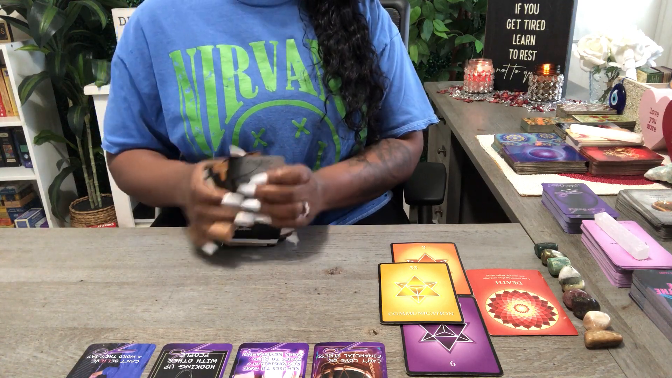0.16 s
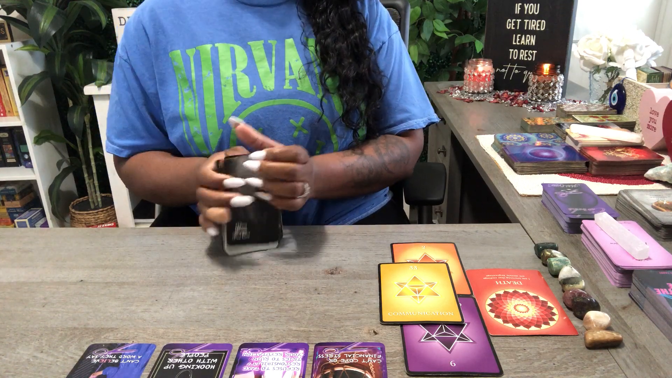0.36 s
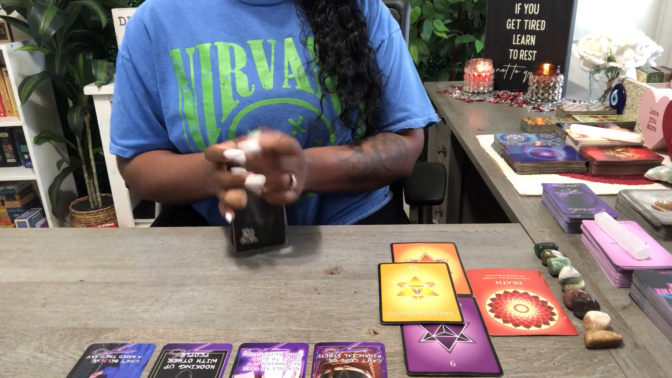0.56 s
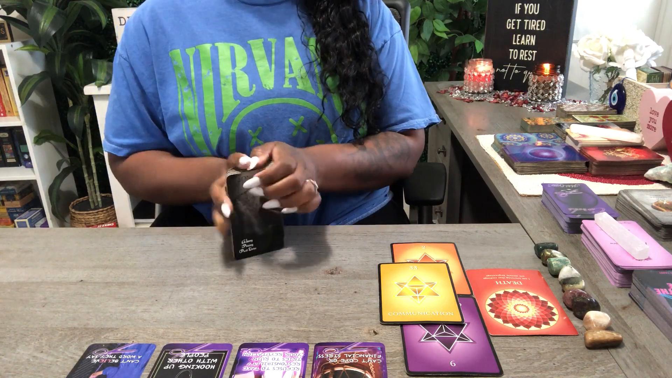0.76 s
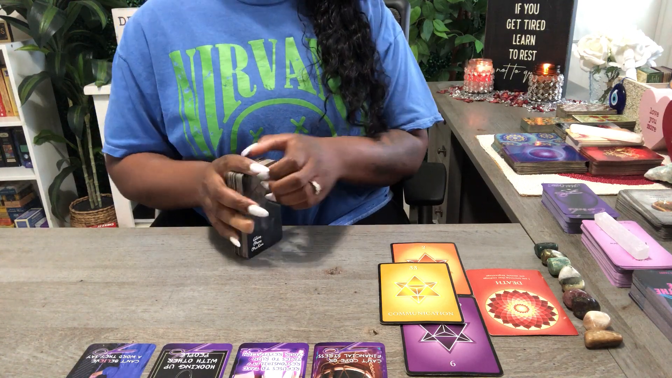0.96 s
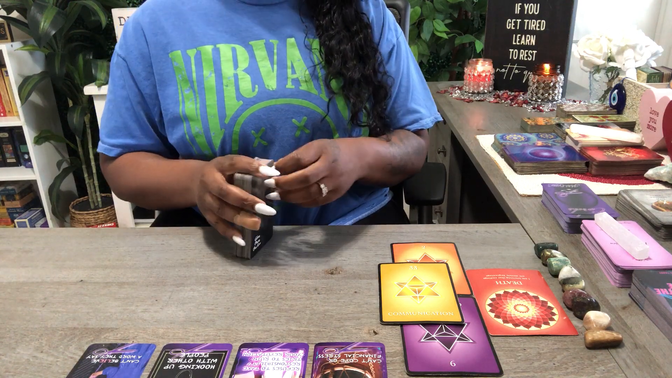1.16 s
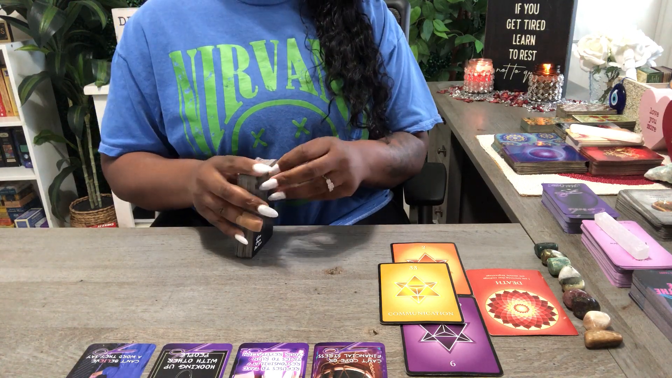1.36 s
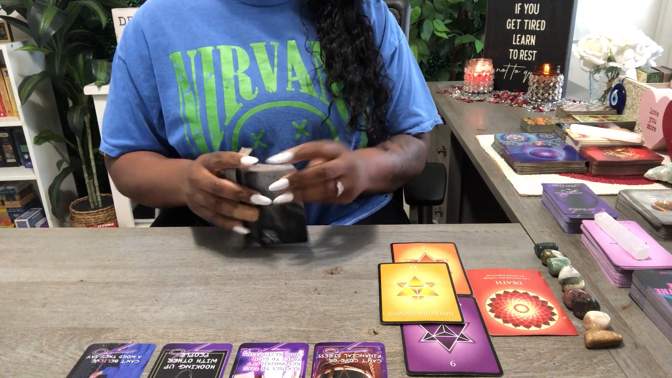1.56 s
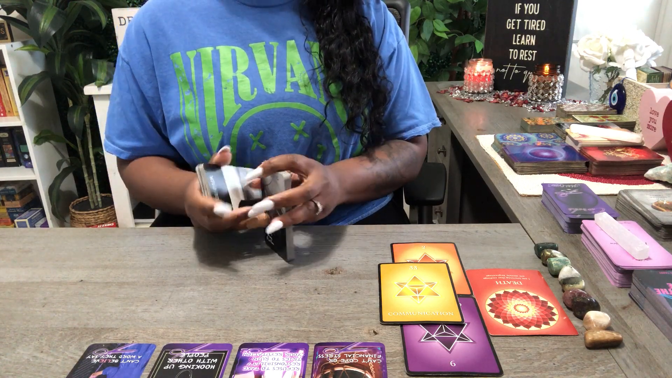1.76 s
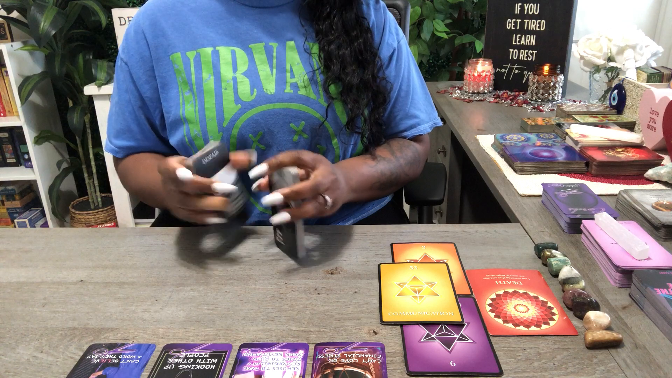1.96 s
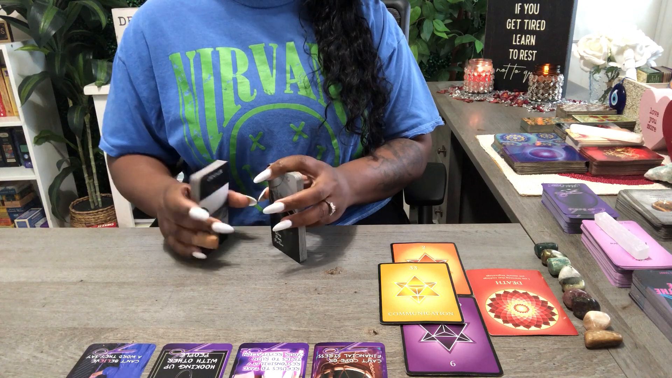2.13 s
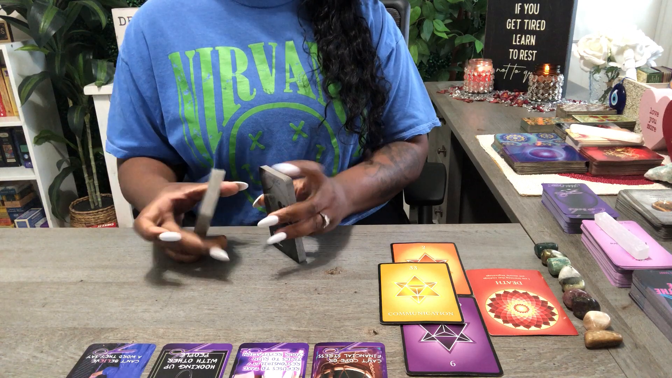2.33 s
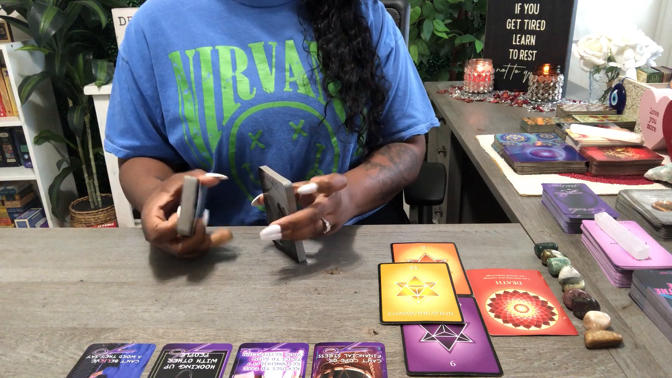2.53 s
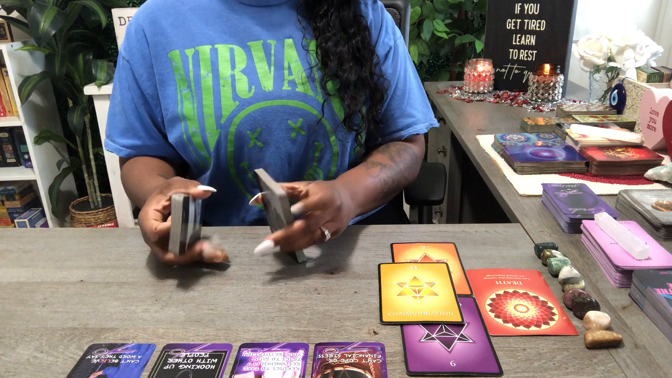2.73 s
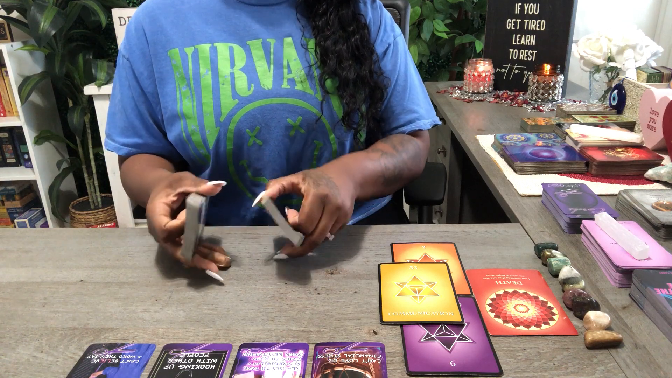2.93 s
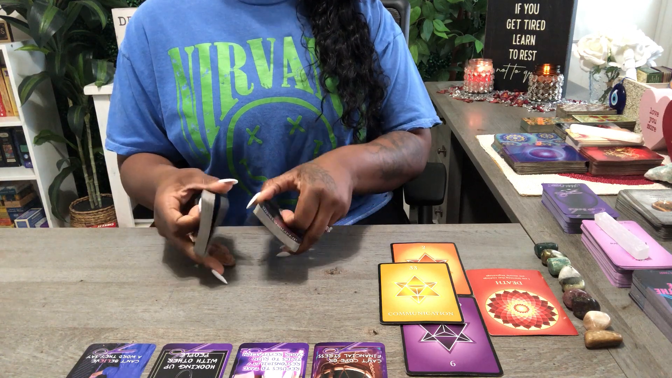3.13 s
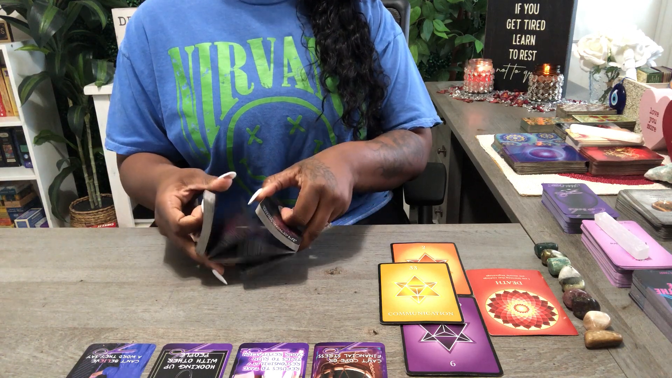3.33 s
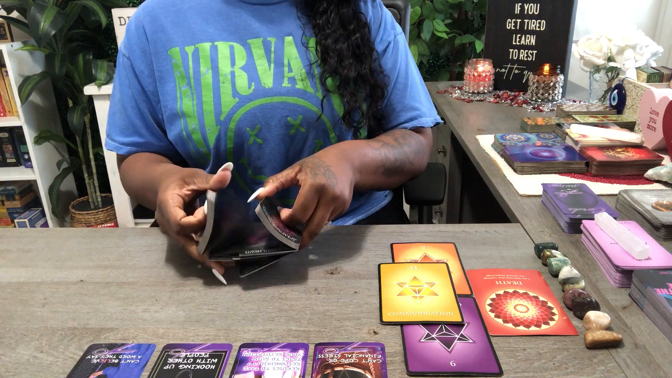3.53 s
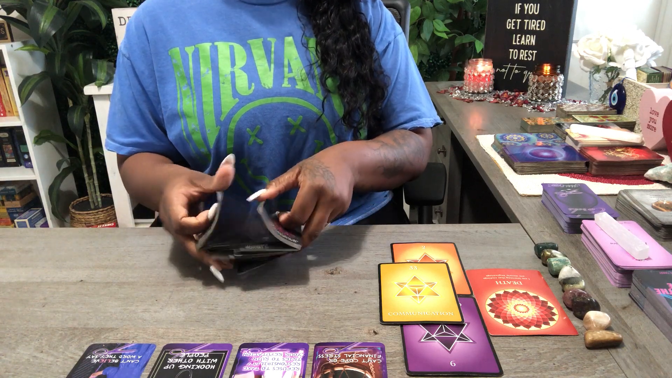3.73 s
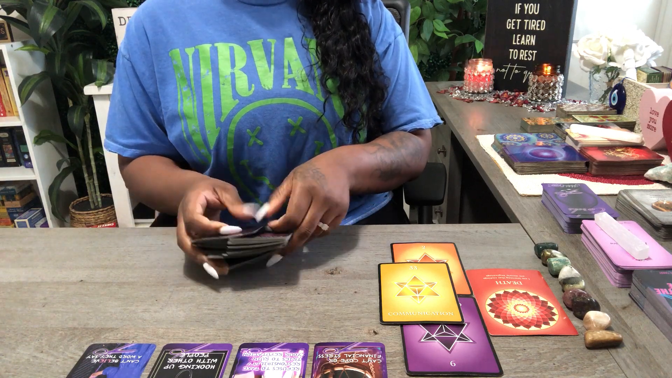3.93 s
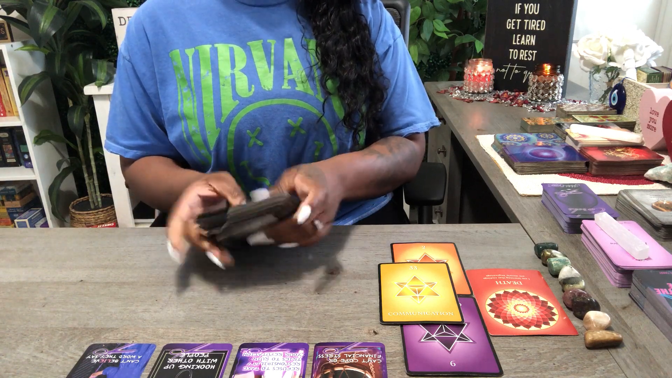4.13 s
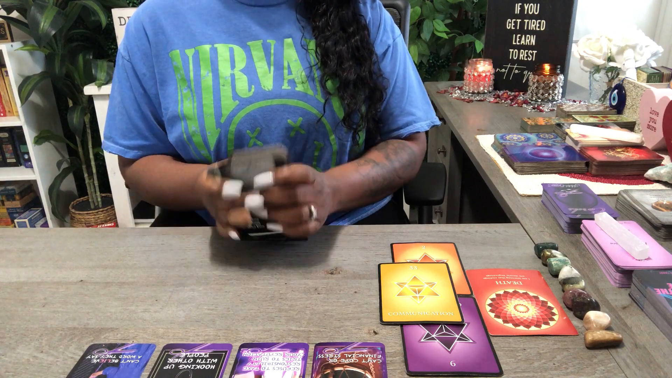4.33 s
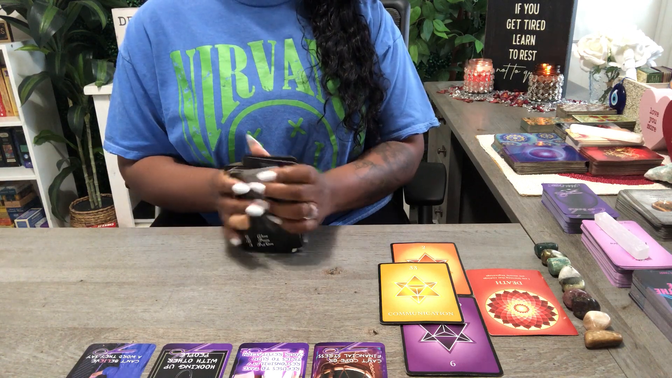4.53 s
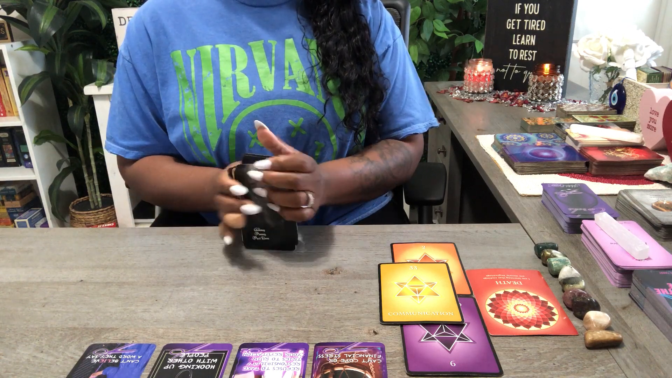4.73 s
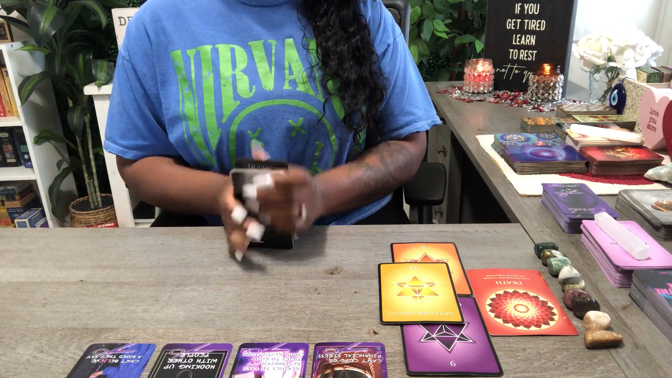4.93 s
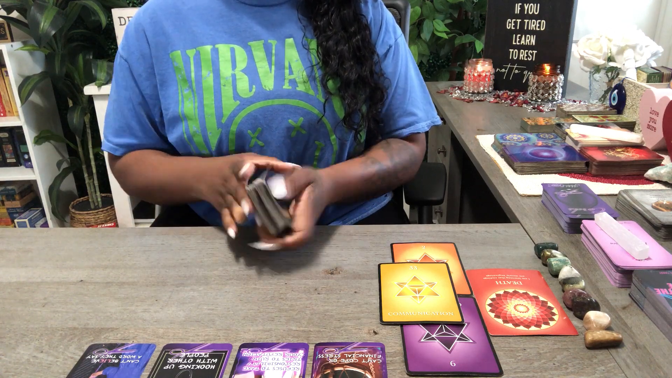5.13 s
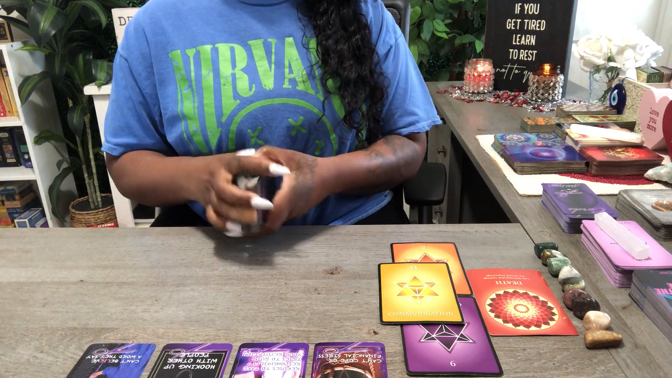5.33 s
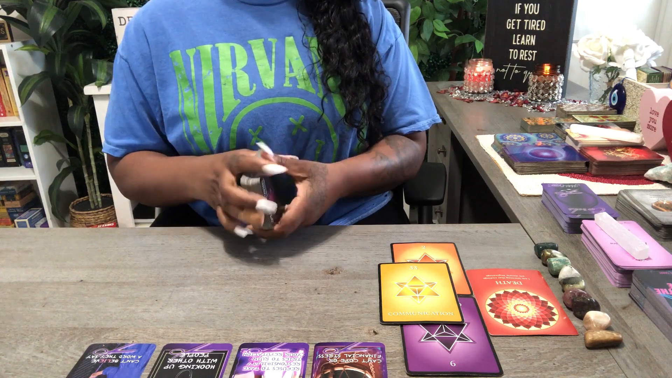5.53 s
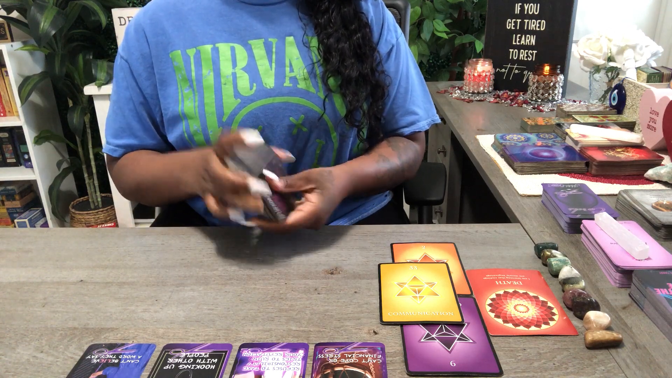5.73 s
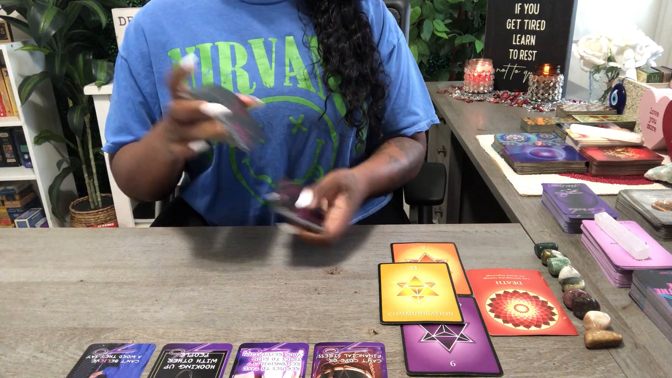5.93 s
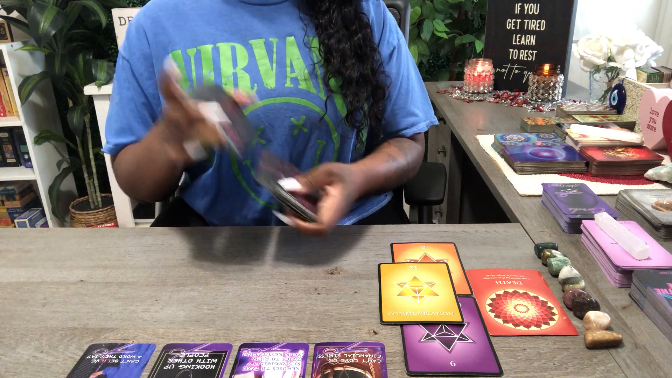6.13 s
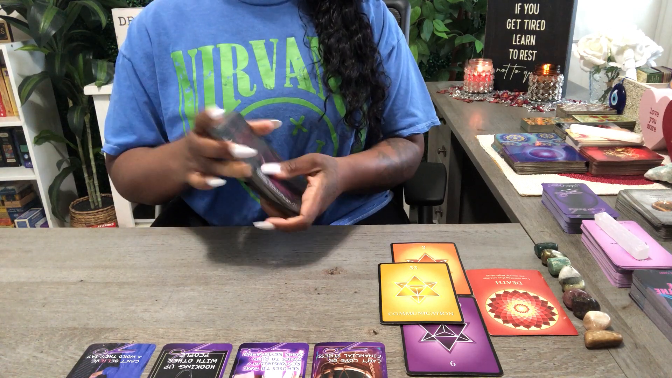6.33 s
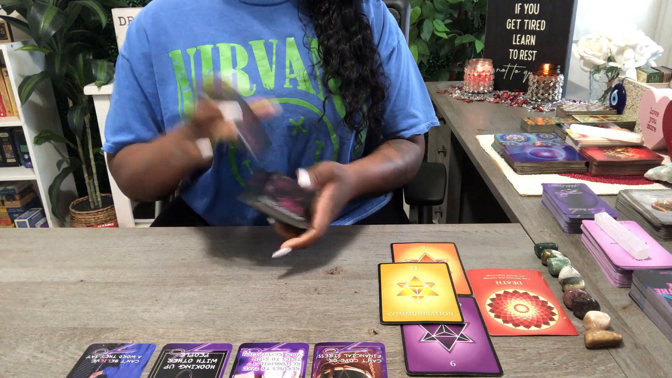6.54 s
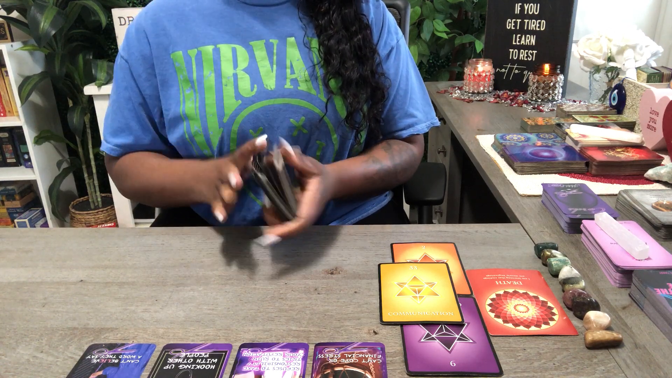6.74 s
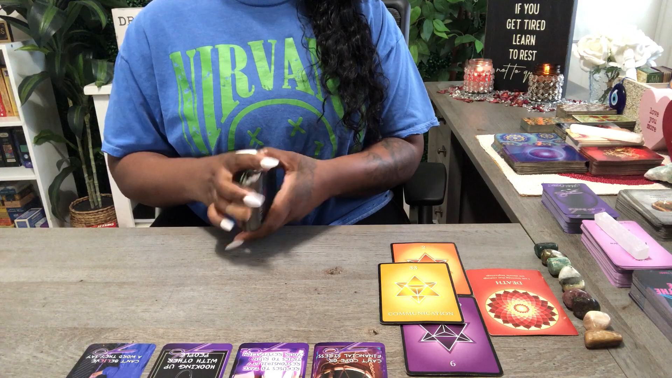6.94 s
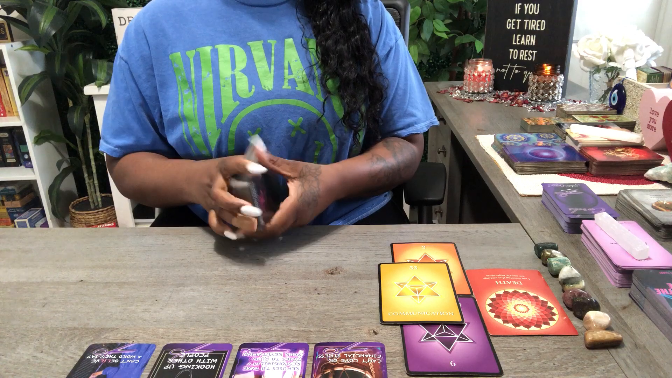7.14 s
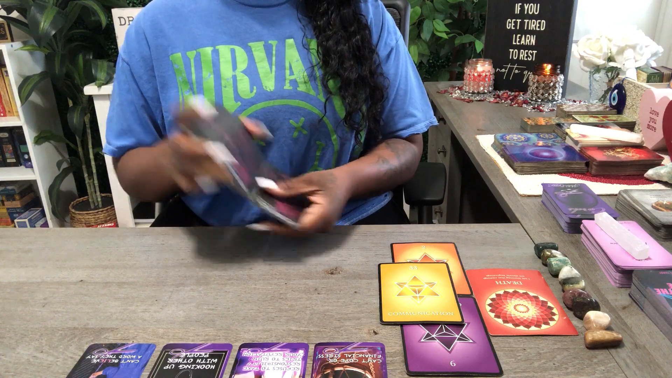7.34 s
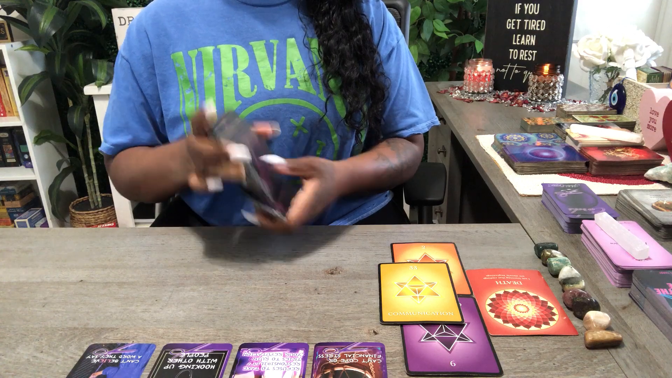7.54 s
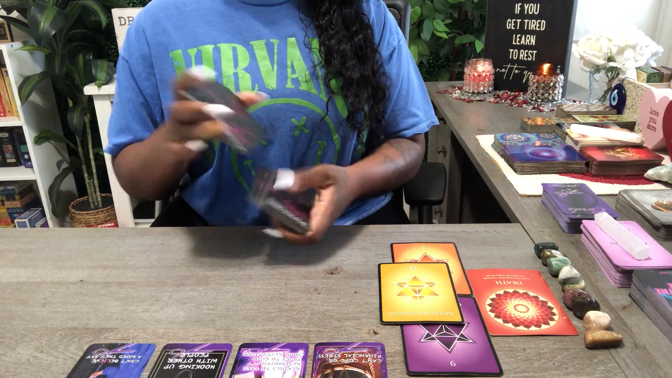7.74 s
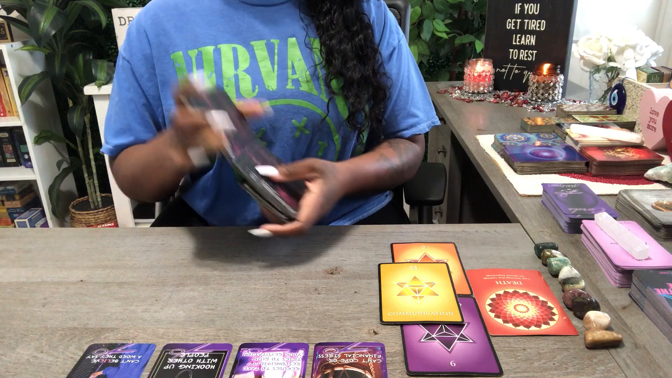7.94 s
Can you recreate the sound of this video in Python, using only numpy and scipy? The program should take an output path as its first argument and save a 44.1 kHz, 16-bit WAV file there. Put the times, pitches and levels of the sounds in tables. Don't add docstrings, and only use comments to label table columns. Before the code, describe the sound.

Close card shuffling indoors: sharp wooden clacks, ticking corners, papery hiss, a riffle closing in a rush, and light overhand slaps over low hum.

```python
import sys
import numpy as np
from scipy import signal
from scipy.fft import rfft, irfft, next_fast_len
from scipy.io import wavfile
from scipy.ndimage import map_coordinates

SR = 44100
rng = np.random.default_rng(int(sys.argv[2]) if len(sys.argv) > 2 else 0)


def bounce(signal):
    frames = np.transpose(np.atleast_2d(signal))
    limited = np.clip(frames, -1, 1)
    pcm = np.round(limited * 32767).astype(np.int16)
    wavfile.write(sys.argv[1], SR, pcm)


def invert_db(level):
    return 10 ** (np.asarray(level, dtype=float) / 20)


N = 356769
LENGTH = 2 ** 15


def unit(x):
    return x / np.sqrt(np.mean(x ** 2) + 1e-20)


def along(points, hz):
    f, v = np.transpose(points)
    return np.interp(np.log(hz + 1), np.log(f + 1), v)


def curves(rows):
    s, *columns = np.transpose(rows)
    return [np.interp(np.arange(N) / SR, s, column) for column in columns]


def wobble(rate):
    knots = rng.standard_normal(int(N * rate / SR) + 4)
    return map_coordinates(knots, [np.arange(N) * rate / SR])


def swells(rows, span_db=25):
    t = np.arange(N) / SR
    power = 0
    for s, db, rise, fall in rows:
        drop_db = span_db * np.maximum((s - t) / rise, (t - s) / fall)
        power = power + invert_db(2 * (db - drop_db))
    return np.sqrt(power)


def coloured(x, spectrum):
    m = next_fast_len(len(x) + 8192)
    gain = invert_db(along(spectrum, np.fft.rfftfreq(m, 1 / SR)))
    return unit(irfft(rfft(x, m) * gain, m)[:len(x)])


def causal(gain):
    cepstrum = irfft(np.log(gain + 1e-6))
    half = len(cepstrum) // 2
    cepstrum[1:half] *= 2
    cepstrum[half + 1:] = 0
    return np.exp(rfft(cepstrum))


def resonance(f, hz, width):
    return 1j * f * width / (hz * hz - f * f + 1j * f * width)


# delay_s, level_db
WALLS = [(.009, -9), (0.014, -26), (0.018, -12), (0.023, -8.5), (0.03, -7.5)]
# band_hz, t60_s
DECAY = [(100, 0.092), (300, 0.48), (1000, 0.49), (3000, 0.51), (6000, 0.46), (12000, 0.39)]
# band_hz, level_db
FURNISHING = [(100, -2), (170, -0.5), (230, -3), (400, 2.5), (1200, -1.5), (3000, -3), (4500, -3),
              (7000, -6), (12000, -9.5)]


def room(tail_db, walls_db, onset):
    hz, t, z = signal.stft(rng.standard_normal(LENGTH), SR, nperseg=256)
    tail_levels = along(FURNISHING, hz)[:, None] - 60 * t / along(DECAY, hz)[:, None]
    tail = signal.istft(z * invert_db(tail_levels), SR, nperseg=256)[1][:LENGTH]
    tail *= 1 - np.exp(-(np.arange(LENGTH) / SR / onset) ** 2)
    early = np.zeros(LENGTH)
    early[0] = 1
    for (s, db), luck_db in zip(WALLS, rng.normal(0, 1, len(WALLS))):
        early[round(s * SR)] = invert_db(db + walls_db + luck_db)
    return rfft(early), invert_db(tail_db) * rfft(tail) / np.linalg.norm(tail)


# band_hz, level_db
FACING = [(150, 5.5), (600, 4), (1800, -1), (3500, 4), (6000, 3), (12000, 0)]


def contacts(table, colour, modes, low, ms, gain_db, tail_db):
    out = np.zeros(N + LENGTH)
    f = np.fft.rfftfreq(LENGTH, 1 / SR)
    t = np.arange(1024) / SR
    beam = causal(invert_db(along(FACING, f)))
    ring_in_room = 0.22
    for s, db, hz, low_db, crisp_db, edge_db in table:
        rattle_ms = ms * invert_db(0.33 * (db + 23) - 0.13 * (crisp_db + 13))
        u = 1000 * t / rattle_ms
        rattle = rfft(u * np.exp(-u) * rng.standard_normal(len(t)))
        rattle = irfft(rattle / (np.abs(rattle) + 1e-9) ** 0.39)
        rattle *= (u < 12) * np.exp(-u / 2.05)
        rattle = rfft(rattle / np.linalg.norm(rattle), LENGTH)
        ringing = sum(invert_db(top_db + 0.58 * rng.standard_normal()) * resonance(f, mode_hz, width)
                      for mode_hz, width, top_db in modes)
        body = causal(invert_db(along(colour(hz, low_db, crisp_db, edge_db), f)))
        early, tail = room(tail_db - 0.081 * (crisp_db + 12.5), walls_db=-5.5, onset=0.0032)
        diffuse = np.abs(rattle) ** 0.4 * tail
        heard = rattle * (early - 1 + beam) * (1 + ringing) + diffuse * (1 + ring_in_room * ringing)
        sound = irfft(body * heard + invert_db(low_db) * low(f) * (early + tail))
        sound[-2048:] = 0
        direct_peak = np.abs(irfft(body * rattle * beam * (1 + ringing))).max()
        out[round(s * SR):][:LENGTH] += invert_db(db + gain_db) * sound / direct_peak
    return out[:N]


# pitch_hz, level_db (rms)
HUM = [(59.2, -65), (70.0, -63), (118.4, -54), (177.6, -58.5), (269.2, -59.5), (360.7, -61), (446.8, -71),
       (495.3, -66.5)]
# band_hz, level_db (per Hz)
AIR = [(15, -37), (25, -10), (117, -3), (190, -11), (223, -11.5), (270, -10), (309, -9.5), (489, -10.5),
       (714, -14), (1040, -13.5), (1330, -14), (1650, -16.5), (2000, -19), (12500, -47.5), (16000, -52)]


def background():
    t = np.arange(N) / SR
    hum = 0
    for hz, db in HUM:
        line = np.sin(2 * np.pi * hz * t + 1.17 * wobble(7))
        hum = hum + invert_db(db + 3 + 0.8 * wobble(4)) * line
    air_level = invert_db(-51.5 + 0.68 * wobble(4.85))
    return hum + air_level * coloured(rng.standard_normal(N), AIR)


# loudest_s, rumble_db, fade_s
PUSHES = [(.13, -49.5, .9), (.67, -42, 0.48), (1.25, -49, 0.17), (1.67, -48, .4), (2.12, -41, .33),
          (2.95, -55, 0.45), (3.42, -52, 0.071), (3.87, -43, 0.17), (4.48, -44, 0.25), (4.78, -49, 1),
          (5.1, -54, .6), (6.67, -58, .5), (7.12, -56, 0.16), (7.46, -58, .22)]


def push():
    swell_s, still_db = 0.075, -67
    level = np.hypot(invert_db(still_db), swells([(s, db, swell_s, fade) for s, db, fade in PUSHES]))
    rumble = [(12, -47), (25, 4), (60, -4), (110, -35), (300, -120)]  # (Hz, dB)
    return level * coloured(rng.standard_normal(N), rumble)


# pitch_hz, width_hz, level_db
DESK = [(110, 36, -3), (159.6, 25.5, 6), (433, 300, -15.5)]


def desk_boom(f):
    modes = sum((-1) ** k * invert_db(db) * resonance(f, hz, width) for k, (hz, width, db) in enumerate(DESK))
    return invert_db(0.5) * modes / (1 + 1j * f / 900) ** 2


def clack(hz, low_db, crisp_db, edge_db):
    return [(200, -30), (290, -22), (450, -9), (0.73 * hz, -4), (hz, 0),
            (3100, crisp_db / 3 - 2.5), (3800, 0.82 * crisp_db), (5000, crisp_db),
            (7200, edge_db + 14), (11000, edge_db), (16000, edge_db - 19)]


# start_s, peak_db, clack_hz, thump_db, crispness_db
SQUARING = [(0.0605, -27, 1150, -18, -23), (0.0673, -17, 1220, 3, -31), (0.0868, -18, 980, 5, -26),
            (0.0995, -17.5, 1200, 10.5, -25), (0.1105, -18, 900, -2, -55), (0.3795, -26, 2500, -3, -20),
            (0.3925, -12, 2600, -1, -11), (0.3970, -13.5, 1900, 1, -18), (0.4130, -12, 1470, 9.5, -27),
            (0.4200, -19, 1900, -6, -13), (0.4255, -11.5, 1700, -11, -19), (0.4375, -13.5, 2020, -8, -21),
            (0.4570, -18, 1600, -11, -31)]
DROP = [
    (0.6389, -2.5, 1110, 8, -9),
    (0.6415, -1, 1900, -3, -9),
    (0.6440, -4.5, 2930, -2, -16),
    (0.6535, -9, 1700, -4, -5),
    (0.6600, -15, 1000, -9, -14),
    (0.6705, -6.5, 2500, -17, -9),
    (0.8105, -16.5, 2240, -22, -5),
    (0.8145, -17.5, 1900, -6, -1),
]
CUT = [
    (1.188, -27.5, 1300, 11, -30),
    (1.6378, -11, 1290, 11, -47),
    (1.6562, -12.5, 2840, 8, -10),
    (1.667, -11.5, 1500, 0, -20.5),
    (1.7215, -18, 1400, -3, -16),
    (1.7245, -20, 2600, -12, -12),
]
SECOND_HALF = [
    (2.0437, -9, 1000, 6.5, -31),
    (2.0725, -6.5, 2730, 4.1, -12),
    (2.0961, -3.5, 1500, 11.5, -17.5),
    (2.0985, -1, 1090, 4.3, -18),
    (2.1069, -2.5, 2060, 10.7, -17.5),
    (2.1088, -4.5, 1860, 2.9, -26),
]
RESQUARING = [(4.4775, -28, 1150, 12, -27), (4.4978, -27, 1019, -17, -58), (4.5171, -16, 2340, 5, -17),
              (4.5200, -19.5, 1200, -1, -31), (4.5350, -16.5, 1400, 0, -37), (4.5525, -16.5, 1630, 3, -39),
              (4.5650, -9, 2060, -5, -21), (4.5765, -19, 1500, -14, -31), (4.6142, -15.5, 2400, 2, -17),
              (4.7200, -18, 2600, 12, -8), (4.7235, -15.5, 2600, 3, -14), (4.7270, -13, 1250, -14, -28),
              (4.7420, -22, 1800, -7, -15), (4.7540, -13.5, 900, 1.5, -34.5), (4.7680, -19.5, 900, 15, -12),
              (4.8406, -20.5, 1570, -19, -19), (4.9603, -11.5, 2800, -0.5, -9.5),
              (5.0189, -24, 1390, 9, -13)]
# pitch_hz, width_hz, level_db (over the clack)
NEAR_SPOT = [(768, 16, 15.5), (1460, 130, 11), (1900, 34, 7), (2210, 50, 8), (2560, 33, 10), (3030, 60, 5),
             (3480, 60, 12), (4200, 100, 9)]
HARD_SPOT = [(534, 110, 2.3), (975, 49, 7.9), (1660, 59, 3.3), (2200, 120, 3.1), (2565, 44, 16),
             (2800, 69, 4.4), (3200, 67, 8.4), (4210, 36, 7.1)]
LEFT_SPOT = [(556, 64, 7.3), (740, 20, 3.6), (900, 44, 3), (1370, 40, 3), (1500, 50, 12), (1630, 68, 11.5),
             (2580, 50, 5), (2920, 81, 4), (3400, 54, 9.6), (4300, 81, 4.9)]
RIGHT_SPOT = [(584, 130, 3.8), (1000, 64, 1.7), (1465, 59, 8.8), (2190, 25, 4.1), (2610, 36, 3.66),
              (2870, 42, 7.2), (3050, 200, 2.2), (4300, 50, 2.7)]
LATE_SPOT = [(782, 14, 3.2), (1212, 22, 2.9), (1470, 39, 4.3), (1644, 50, 8.8), (2250, 52, 7.8),
             (2770, 87, 2.4), (3500, 140, 8.2), (4200, 140, 5)]


def taps():
    out = 0
    for knocks, modes in [(SQUARING, NEAR_SPOT), (DROP, HARD_SPOT), (CUT, LEFT_SPOT),
                          (SECOND_HALF, RIGHT_SPOT), (RESQUARING, LATE_SPOT)]:
        edged = [(*row, -34 + 0.61 * row[-1]) for row in knocks]
        out = out + contacts(edged, clack, modes, desk_boom, ms=0.85, gain_db=-4, tail_db=-1)
    return out


def click(hz, low_db, crisp_db, over_db):
    return [(300, -38), (0.5 * hz, -19), (0.85 * hz, -5), (hz, 0), (1.32 * hz, -9),
            (1.65 * hz, over_db), (1.95 * hz, over_db - 15), (16000, over_db - 32)]


# start_s, peak_db, click_hz, overtone_db
TIPS = [
    (0.0680, -40, 7300, -30),
    (0.0980, -33, 9100, -30),
    (0.2725, -38, 7360, -12),
    (0.3905, -34, 9300, -30),
    (0.3925, -13, 3870, -21),
    (1.6380, -29, 4400, -1),
    (4.5460, -26, 9000, -20),
    (4.7168, -25, 6840, -20),
    (4.9603, -27, 5500, -10),
]
# start_s, peak_db, click_hz, overtone_db
CORNERS = [(0.087, -18, 3600, -18), (0.0973, -10.5, 4200, -36), (0.3905, -9, 3500, -24),
           (0.43, -20, 4000, -18), (1.6112, -42, 3600, -8), (1.6664, -11, 3600, -42), (2.1, -7, 4200, -1.5),
           (2.1062, -8, 3500, 0), (4.5265, -38, 3900, -17), (4.5352, -34, 3900, -5),
           (4.5425, -18, 3800, -12), (4.545, -9, 4200, -18), (4.5634, -9, 3930, -28),
           (4.6185, -25, 4500, -12), (4.7063, -21, 3580, -20), (4.7168, -11, 4000, -11),
           (4.731, -11, 3560, -29), (4.733, -23, 4200, -4), (4.7586, -8.5, 3670, -18),
           (4.7780, -21, 4300, -28), (6.3588, -16.5, 4200, -3), (6.371, -32, 4200, -12),
           (6.6546, -23, 4300, -20), (6.6580, -26, 4300, -14)]


def corners(table):
    clicks = [(s, db, hz, 0, -12, over_db) for s, db, hz, over_db in table]
    return contacts(clicks, click, [], np.zeros_like, ms=0.28, gain_db=-4, tail_db=-5)


# band_hz, level_db (per Hz)
HISS = [(1760, -11), (3000, -1), (3220, -4), (5670, -1), (6900, -2), (11400, -4.5), (16000, -7.5)]
# band_hz, level_db (per Hz)
BODY = [(200, -28), (700, -9.5), (1500, -2), (3000, -6.5), (6000, -18), (12000, -41)]
# loudest_s, hiss_db, swell_s, fade_s, body_db (over the hiss)
STROKES = [(0.097, -55, 0.049, 0.034, -11), (0.187, -74, .09, 0.071, -9), (0.287, -55, 0.06, 0.1, 2.5),
           (0.412, -65.5, 0.03, 0.059, 33.5), (0.526, -56, 0.083, 0.038, 0), (0.656, -53, 0.016, 0.051, 2),
           (0.93, -67, 0.2, .12, 10.5), (1.669, -64.5, 0.3, 0.2, 6), (2.108, -52, 0.02, 0.11, 8),
           (2.532, -83, .3, .1, -2.5), (2.801, -69.5, .04, 0.23, 5), (4.268, -61.5, 0.12, 0.068, 6),
           (4.417, -67, 0.076, 0.11, 8.5), (4.557, -52.5, 0.028, 0.021, 26.5),
           (4.632, -56.5, 0.25, 0.048, -6), (4.727, -71, 0.18, .14, -2.5), (4.837, -60, .03, 0.025, 11),
           (5.041, -64.5, 0.18, 0.093, -3), (5.325, -61.5, .115, 0.15, -8), (5.854, -46, 0.051, 0.096, -12),
           (6.932, -62.5, 0.32, 0.29, -1), (7.335, -67.5, 0.12, 0.17, 9.5), (7.362, -46, 0.027, 0.085, -7),
           (7.396, -43, 0.063, 0.044, -15), (7.43, -57, .1, 0.11, -12), (1.83, -69, 0.048, .05, -10),
           (2.35, -74, .06, .06, -10), (7.713, -50.5, 0.067, 0.075, -6), (8.02, -55, .08, 0.069, -16),
           (5.17, -68, .06, .06, -10)]
# start_s, hiss_db, body_db (over the hiss)
SKIDS = [
    (6.105, -53.5, 8.5),
    (6.369, -48, 6.5),
    (6.667, -50, 3.5),
    (7.62, -54.5, 5.5),
    (7.893, -50.5, -10),
]
# time_s, hiss_db
FLOW = [
    (3.285, -85),
    (3.345, -62),
    (3.39, -63),
    (3.601, -65),
    (3.739, -66),
    (3.775, -54),
    (3.81, -41.5),
    (3.828, -46),
    (3.84, -36.5),
    (3.853, -32),
]


def slide():
    skid_swell_s, skid_fade_s = 0.0058, 0.18
    flow_body_db, flow_fade_s = 0.4, 0.084
    start, (end, end_db) = FLOW[0][0], FLOW[-1]
    rubs = STROKES + [(s, db, skid_swell_s, skid_fade_s, body_db) for s, db, body_db in SKIDS]
    rubs += [(end, end_db, 1 / SR, flow_fade_s, flow_body_db), (end + flow_fade_s, -61.5, flow_fade_s, 0.71, 4.5)]
    rubs += [(s, db - 28, skid_swell_s / 4, 0.12, 1.5) for s, db, *_ in RIFFLE]
    sample = np.arange(N)
    flow = invert_db(curves(FLOW)[0]) * (sample < end * SR) * (sample > start * SR)
    hiss = np.hypot(flow, swells([row[:4] for row in rubs]))
    body_rubs = [(s, db + body_db, rise, fall) for s, db, rise, fall, body_db in rubs]
    body = np.hypot(flow * invert_db(flow_body_db), swells(body_rubs))

    def catches(depth_db):
        return invert_db(depth_db * wobble(600) + 2.4 * wobble(40)) * rng.standard_normal(N)

    dry = invert_db(2) * (hiss * coloured(catches(1.6), HISS) + body * coloured(catches(4.4), BODY))
    return signal.fftconvolve(dry, irfft(sum(room(-5, walls_db=-9, onset=0.0058))))[:N]


def snap(hz, low_db, crisp_db, edge_db):
    beside_db = 0.27 * crisp_db
    return [(200, low_db - 12), (420, low_db), (0.66 * hz, low_db / 2 - 4.5), (0.73 * hz, beside_db), (hz, 0),
            (1.29 * hz, beside_db), (1.3 * hz, crisp_db / 2), (5200, crisp_db),
            (11000, edge_db), (16000, edge_db - 4)]


def puffed(table, puff_db):
    return [(s, db, hz, puff_db + 0.37 * crisp_db, crisp_db, edge_db) for s, db, hz, crisp_db, edge_db in table]


# start_s, peak_db, pocket_hz, crispness_db, edge_db
STRAYS = [(0.1723, -35, 1430, -16, 3), (0.2731, -29.5, 850, -21, -14), (0.2005, -37, 2300, -8, -25),
          (0.3007, -33, 2200, -12, -24), (0.5180, -27, 1608, -9, -16), (0.8556, -27, 1570, -16, -29),
          (0.9227, -40, 1460, -13.5, -6), (1.4803, -38.5, 1970, -22, -36), (1.6712, -34, 3000, -6, -6),
          (1.6795, -36, 3000, -4, -8), (1.7165, -40, 3000, -6, -6), (1.7335, -43, 3000, -2, -8),
          (2.481, -40.5, 1433, -7, -22), (2.521, -36, 1050, -20, -22), (2.596, -48, 3000, -6, -6),
          (2.7849, -40, 870, -13, -16), (2.9383, -32, 1370, -2, -22), (3.036, -58, 3000, -1, -13),
          (3.1071, -61, 1020, -32, -42), (3.187, -54, 3000, -8, -7), (3.244, -39.5, 3360, -9, -19),
          (3.304, -48, 3000, -6, -2), (3.342, -36, 3000, 0, -6), (3.348, -28.5, 3000, 1, -3),
          (4.4010, -35, 1280, -31, -52), (5.32, -36, 4210, -9, -20), (4.025, -34.5, 2997, 7, -10),
          (6.923, -32.5, 3000, 1, 3)]
RIFFLE = [(3.334, -35, 980, -24, -23), (3.408, -26, 1700, -15, -16), (3.4105, -33, 1700, -21, -12),
          (3.436, -26.5, 1470, -6, -8), (3.4390, -31, 3000, 6, -16), (3.4420, -36, 2000, -4, -20),
          (3.456, -35, 4000, -2, -18), (3.5015, -33, 2980, 2, -10), (3.5040, -29, 3000, 3, -6),
          (3.505, -35, 3000, 2, -10), (3.512, -44, 3000, -2, -2), (3.562, -24, 2600, 5, -4),
          (3.629, -23.5, 1040, -15, -20), (3.6360, -28, 3000, 0, 0), (3.639, -23, 1510, -3, -8),
          (3.654, -35, 1480, -30, -30), (3.6790, -23, 1380, -2, -8), (3.683, -23, 1370, -24, -19),
          (3.6987, -26.5, 1740, -9, -12), (3.7100, -30, 2600, -12, -25), (3.7200, -24, 1400, -3, -12),
          (3.742, -27.5, 1420, -9, -7), (3.7761, -31, 1340, -1, -7)]
CLOSING = [(3.7817, -29, 2090, 0, -6), (3.7997, -27, 1600, 3, 2), (3.8055, -19.5, 2020, -3, -7),
           (3.8190, -23, 2600, -2, -4), (3.834, -34, 1450, -16, -16), (3.8437, -19, 1854, -2, 0),
           (3.8320, -25, 2000, -2, -7), (3.8375, -19, 2000, -4, -9), (3.8490, -8.5, 1290, -5, -3.5),
           (3.8545, -14, 2650, -6, -5), (3.8530, -12, 1300, -7, -13)]
OVERHAND = [
    (5.8679, -29, 1540, -6, 14),
    (6.087, -27, 3030, -4, -2.5),
    (7.52, -42, 3050, -15, -7),
    (7.701, -26, 950, -24, -21),
    (7.8877, -13.5, 1600, -31, -32),
    (7.9611, -26.5, 1370, -24, -20),
]
FULL_CATCH = [
    (6.3588, -15.5, 1870, -8, -9.5),
    (6.3655, -19.5, 825, -17, -32),
    (6.3695, -24, 1320, -19, -27),
]
LIGHT_CATCH = [
    (6.6580, -27, 1300, -24, -24),
    (6.6660, -33, 615, -17, -28),
    (6.6810, -36, 1700, -13, -30),
]
LANDINGS = [
    (3.3514, -32.5, 1597, -9, -21),
    (6.0897, -32, 2250, -22, -27),
    (6.1513, -32.5, 2260, -7, -24),
    (6.655, -33, 2300, -3, -10),
    (7.6105, -34, 1140, -5, -15),
]
# pitch_hz, width_hz, level_db
FULL_HOLLOW = [(490, 150, 2), (1000, 60, 3), (1320, 60, 3), (2120, 80, 7.4), (3230, 73, 4), (4370, 100, 4)]
LIGHT_HOLLOW = [(608, 100, 12), (1280, 60, 3), (2070, 60, 3), (2550, 80, 3), (4300, 200, 4)]


def flicks():
    overhand_puff_db = -8
    cards = puffed(STRAYS, -11) + puffed(RIFFLE, -13) + puffed(CLOSING, 6.5) + puffed(OVERHAND, overhand_puff_db)
    out = contacts(cards, snap, [], np.zeros_like, ms=0.97, gain_db=-2.5, tail_db=-1)
    for catch, hollow in [(FULL_CATCH, FULL_HOLLOW), (LIGHT_CATCH, LIGHT_HOLLOW)]:
        caught = puffed(catch, overhand_puff_db)
        out = out + contacts(caught, snap, hollow, np.zeros_like, ms=0.77, gain_db=-1, tail_db=-2)
    landed = puffed(LANDINGS, 6.5)
    return out + contacts(landed, snap, [], np.zeros_like, ms=8.5, gain_db=0.5, tail_db=-0.5)


# start_s, peak_db, pitch_hz, t60_s
THUMPS = [
    (0.644, -36, 75, .2),
    (2.10, -35, 85, .2),
    (4.476, -33, 60, 0.12),
    (4.567, -35, 95, .1),
    (7.9, -58, 60.5, .3),
]


def thumps():
    out = np.zeros(N)
    for s, db, hz, t60 in THUMPS:
        t = np.maximum(np.arange(N) / SR - s, 0)
        rise = 1 - np.exp(-t / 0.0029)
        out += invert_db(db - 60 * t / t60) * np.sin(2 * np.pi * hz * t) * rise
    return out


def scene():
    quiet_room = background() + push()
    desk = taps() + corners(TIPS) + corners(CORNERS)
    cards = slide() + flicks()
    return (quiet_room + desk + cards + thumps())[None]


def roll_off(x):
    return signal.sosfilt(signal.butter(12, 16660, fs=SR, output="sos"), x)


# band_hz, level_db
MICROPHONE = [(20, -2), (14500, 0.5), (15600, -4), (16100, -34), (16700, -85), (20000, -100)]


def record(dry):
    m = next_fast_len(N + 8192)
    response = invert_db(along(MICROPHONE, np.fft.rfftfreq(m, 1 / SR)))
    heard = irfft(rfft(dry, m) * response, m)[:, :N]
    heard = heard / (1 + np.abs(heard / 0.66) ** 4) ** (1 / 4)
    return roll_off(heard)


dry = scene()
out = record(dry)
bounce(out)
```